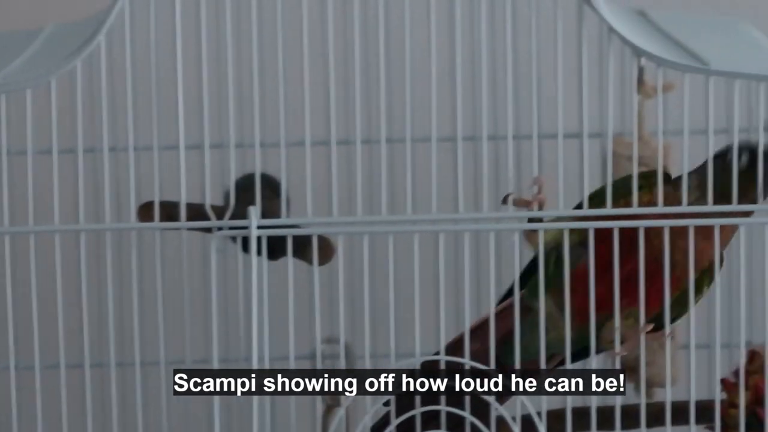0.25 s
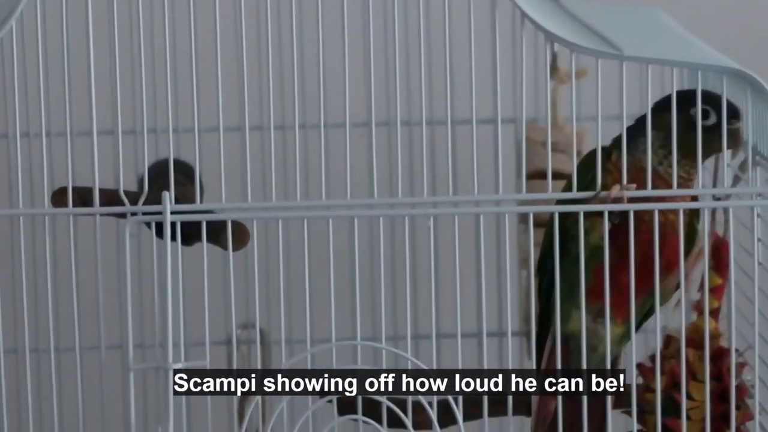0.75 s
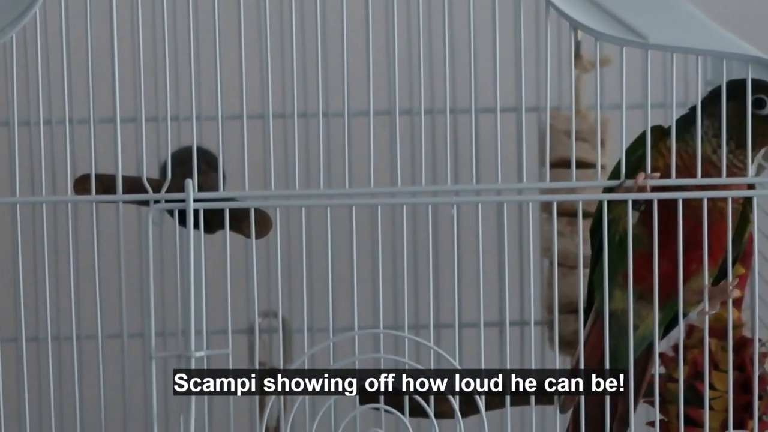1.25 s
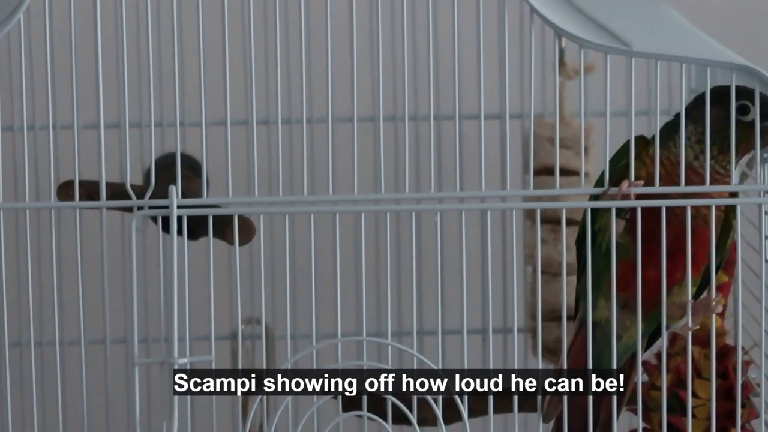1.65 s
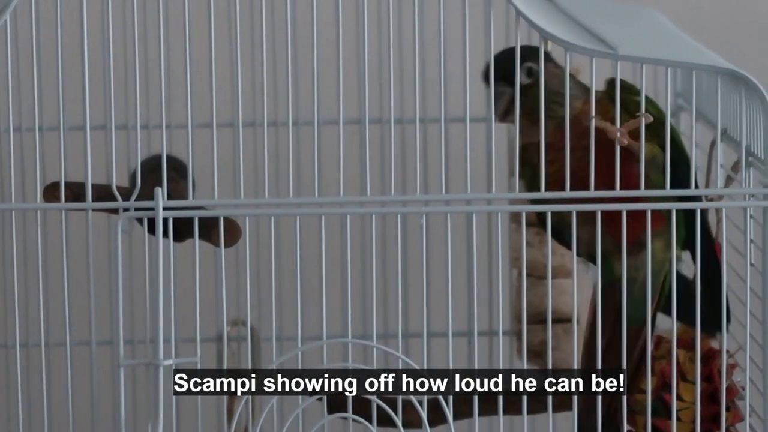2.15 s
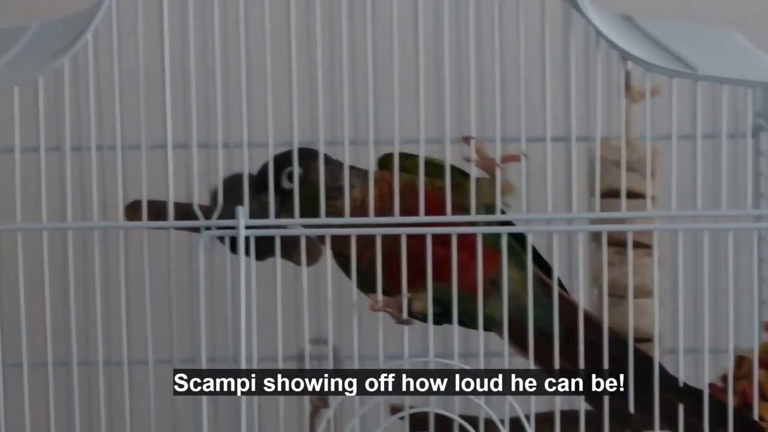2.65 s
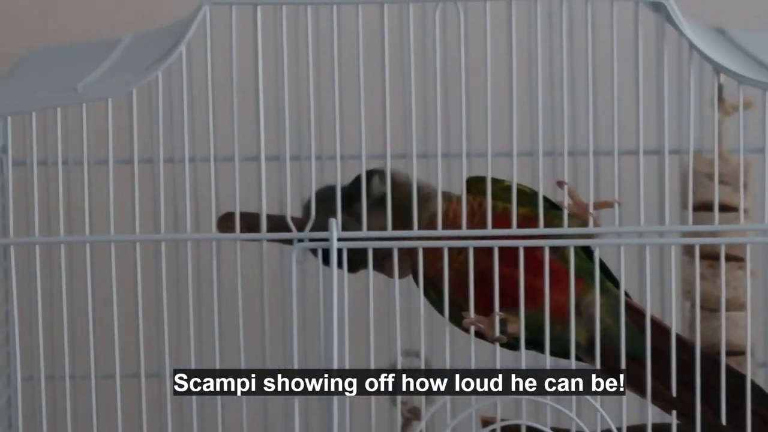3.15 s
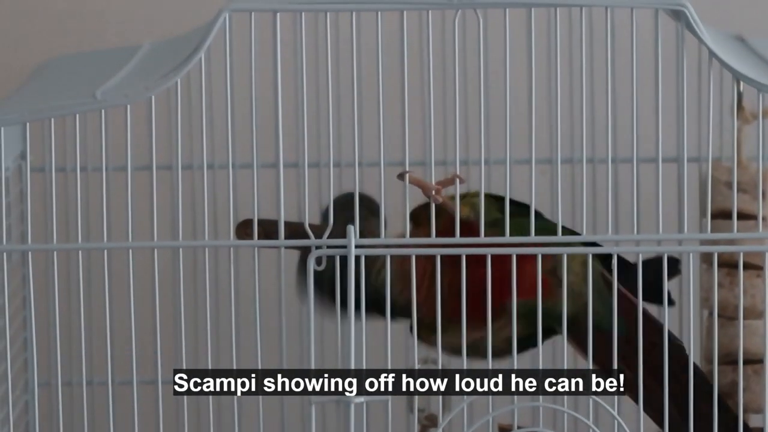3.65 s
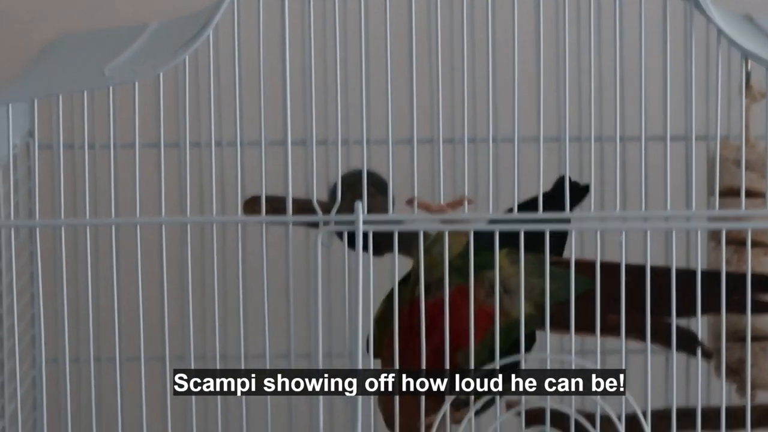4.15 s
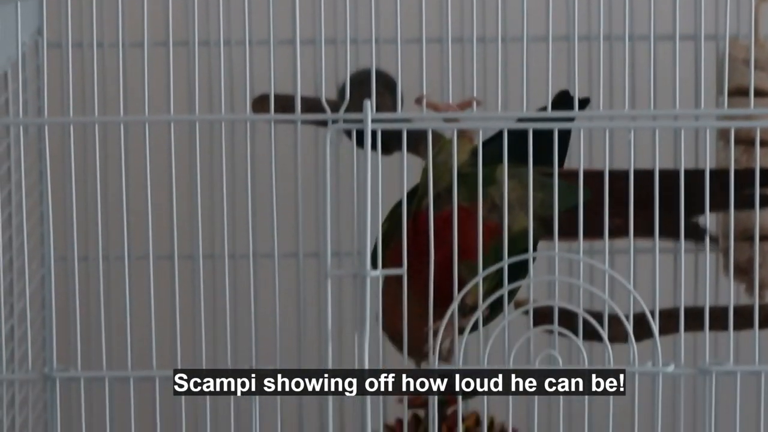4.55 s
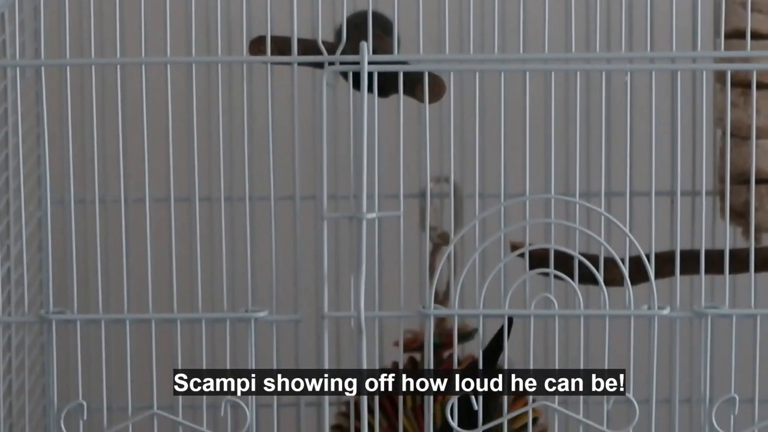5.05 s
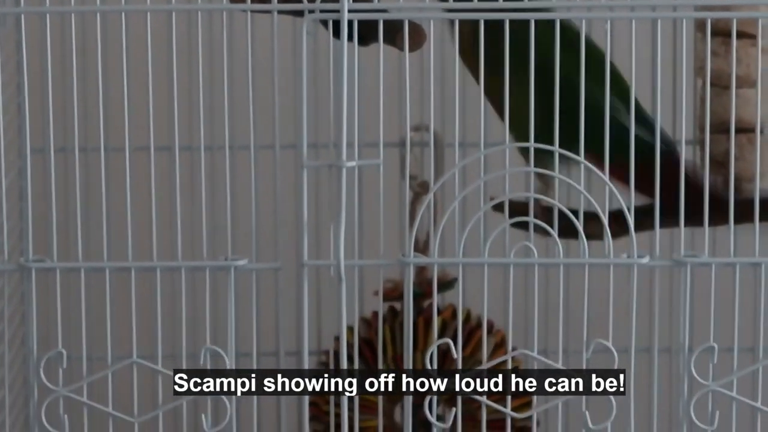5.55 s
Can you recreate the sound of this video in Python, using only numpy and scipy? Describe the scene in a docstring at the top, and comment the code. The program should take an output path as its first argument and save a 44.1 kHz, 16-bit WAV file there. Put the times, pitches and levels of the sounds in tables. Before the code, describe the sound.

A small caged parrot screeches harshly in short piercing bursts indoors, pauses with light scuffing on the bars, then growls and screeches again.

```python
"""A small parrot screeches eight times in a wire cage indoors, with one soft mutter and a growl between.
The two sides of its syrinx sound at once, a buzzy low voice and a high whistle. Each screech scoops up out of
a rasp, holds, and is cut off; now and then the whistle flares up pure and the low voice gives way to it.
Short grainy noises are the bird scuffing along the bars, and sparse decaying echoes make the room ring.
Wavering sine tones, a rumble and coloured noise make a faint appliance hum and the hiss of the room."""
import sys
import numpy as np
from scipy import signal
from scipy.fft import rfft, irfft, next_fast_len
from scipy.io import wavfile
from scipy.ndimage import uniform_filter1d

SR = 44100
rng = np.random.default_rng(int(sys.argv[2]) if len(sys.argv) > 2 else 0)


def file_out(sig):
    """Save sig as 16-bit WAV at sys.argv[1]."""
    # one column per channel
    cols = np.atleast_2d(sig).T
    # limit, then scale
    lim = np.clip(cols, -1, 1)
    pcm = np.round(lim * 32767).astype(np.int16)
    wavfile.write(sys.argv[1], SR, pcm)


N = 255780
TIME = np.arange(N) / SR

# colour of the rasp and of the growl's hiss: frequency_hz, level_db
RASP_COLOUR = [(400, -43.5), (900, -21.5), (1400, -13.5), (1850, -12), (2800, -3.5), (3600, -2),
               (4300, -0.5), (5400, -4), (7200, -8), (9200, -15.5), (11000, -9.5), (12600, -20),
               (13600, -31), (15500, -36.5)]
# how much of the overtone edge each frequency gets: frequency_hz, share (0-1)
EDGE_SHARE = [(3300, 0.13), (5200, 0.88)]
RELEASE_S, RELEASE_DB = 0.035, -39  # after the hold a call falls by this much in each such time


def amp(db):
    """Decibels to gain."""
    return 10 ** (np.asarray(db) / 20)


def unit(x):
    """Scales to rms 1."""
    return x / np.sqrt(np.mean(x ** 2) + 1e-20)


def at_hz(points, hz):
    """Reads a spectrum on a log-frequency axis."""
    f, value = np.transpose(points)
    return np.interp(np.log(hz + 1), np.log(f + 1), value)


def at_time(points, t):
    """Reads a curve of time and value at the times t."""
    s, value = np.transpose(points)
    return np.interp(t, s, value)


def shaped(x, gain):
    """Filters x by a gain given as a function of frequency."""
    size = next_fast_len(x.shape[-1])
    spectrum = rfft(x, size) * gain(np.fft.rfftfreq(size, 1 / SR))
    return irfft(spectrum, size)[..., :x.shape[-1]]


def noise(count, gain):
    """Coloured noise of rms 1."""
    return unit(shaped(rng.standard_normal(count), gain))


def wobble(count, rate_hz):
    """Random motion of rms 1, up to about rate_hz."""
    return noise(count, lambda f: 1 / (1 + (f / rate_hz) ** 4))


def add(mix, s, sound):
    """Mixes a sound in at time s."""
    part = mix[max(round(s * SR), 0):][:len(sound)]
    part += sound[:len(part)]


def air(spectrum):
    """Room noise at two ears, alike in the bass and independent in the treble."""
    # frequency_hz, left-right correlation
    ear_likeness = [(30, 1), (70, .9), (130, .5), (300, 0.66), (700, 0.6), (2000, .4), (8000, 0)]

    def side_gain(f):
        likeness = np.clip(at_hz(ear_likeness, f), -0.9, 1)
        return np.sqrt((1 - likeness) / (1 + likeness))

    mid, side = (noise(N, lambda f: amp(at_hz(spectrum, f))) for _ in range(2))
    side = shaped(side, side_gain)
    return np.array([mid + side, mid - side])


def background():
    """A wavering appliance hum with its rumble, and room hiss that turns from an early to a late colour."""
    # partials of the hum: pitch_hz, level_db
    hum_lines = [(300.2, 0), (97, -14), (645, -18), (740, -15)]
    # spectra of the rumble and of the early and late hiss: frequency_hz, level_db
    rumble_colour = [(15, -50), (25, -10.5), (91, -8.5), (231, -12.5), (265, -11.5), (295, 0.5),
                     (314, -16.5), (329, -6.5), (592, -31.5), (746, -20), (1000, -36.5), (1300, -52.5),
                     (2200, -120)]
    early_colour = [(240, -23), (400, 0.5), (576, -19.5), (756, -1.5), (1020, -5), (1120, -2.5),
                    (2790, -27), (4330, -22.5), (4960, -19), (5770, -31.5), (8060, -26.5), (12300, -31.5),
                    (15000, -59.5)]
    late_colour = [(240, -30), (400, -5), (526, -5), (756, -3.5), (1290, -9.5), (1520, -9.5), (1820, -13.5),
                   (2320, -15), (3830, -21), (12900, -35), (15000, -55.5)]
    # crossfade of the hiss: time_s, share of the late colour (0-1)
    hiss_turn = [(1.0, 0.1), (1.25, 0.84), (2.8, 0.99)]
    # relative levels through the scene: time_s, level_db
    hum_level = [(0.0, -58), (0.73, -50.5), (0.77, -46.5), (0.98, -43), (1.0, -52), (1.39, -64.5),
                 (1.78, -56), (1.84, -70), (2.24, -71.5), (2.79, -57.5), (4.2, -48), (4.47, -53),
                 (4.77, -46), (4.85, -59), (5.74, -59), (5.8, -63)]
    hiss_level = [(0.0, -56.5), (0.89, -49.5), (1.18, -57), (1.31, -62.5), (1.78, -61), (1.94, -67),
                  (3.15, -64.5), (3.51, -57), (4.77, -58), (4.9, -60.5), (5.39, -64), (5.8, -59)]

    hum_gain = amp(at_time(hum_level, TIME))
    hiss_gain = amp(at_time(hiss_level, TIME))
    hum = np.zeros(N)
    for hz, db in hum_lines:
        level = amp(db + 1.8 * wobble(N, rate_hz=9))
        pitch_hz = hz + 0.86 * wobble(N, rate_hz=3.5)
        hum += level * np.sin(2 * np.pi * np.cumsum(pitch_hz) / SR)
    late = np.clip(at_time(hiss_turn, TIME), 0, 1)
    early_hiss = amp(3.0) * np.sqrt(1 - late) * air(early_colour)
    late_hiss = amp(1.14) * np.sqrt(late) * air(late_colour)
    # the rumble follows the hum's level, but only half as far in decibels
    rumble = amp(-57.5) * unit(hum_gain ** 0.5) * air(rumble_colour)
    return amp(1.5) * hum_gain * hum + hiss_gain * (early_hiss + late_hiss) + rumble


def room_tail():
    """Strong echoes off the near walls, then sparse ones; each band dies at its own speed; total energy 1."""
    # decay of each band: frequency_hz, t60_s
    decay = [(500, 0.81), (2600, 0.36), (4200, 0.45), (8000, 0.44), (13000, 0.29)]
    taps = rng.choice([-1., 1.], SR) * (rng.random(SR) < 3000 / SR)  # about 3000 echoes a second
    taps *= np.arange(SR) > 0.004 * SR
    near_walls = (SR * rng.uniform(0.003, 0.016, size=6)).astype(int)
    taps[near_walls] = 2.8 * rng.choice([-1., 1.], size=6)
    hz, t, bands = signal.stft(taps, SR, nperseg=256)
    fade = amp(-60 * t / at_hz(decay, hz)[:, None])
    tail = signal.istft(bands * fade, SR, nperseg=256)[1]
    return tail / np.linalg.norm(tail)


def in_room(x, wet_db, side_wet_db, side_direct_db):
    """Direct sound and room at a close pair of microphones, whose phases part towards the treble."""
    # stereo width: frequency_hz, gain of the side signal_db
    width = [(1300, -12.5), (2600, -14.5), (4200, -7), (6300, -2), (8200, 3.5), (11000, 3), (15000, 9)]
    mid = x + amp(wet_db) * signal.fftconvolve(x, room_tail())[:N]
    quarter_turn = shaped(x, lambda f: 1j)  # every frequency shifted by 90 degrees
    side_room = signal.fftconvolve(x, room_tail())[:N]
    side = amp(side_direct_db) * quarter_turn + amp(side_wet_db) * side_room
    side = shaped(side, lambda f: amp(at_hz(width, f)))
    return np.array([mid + side, mid - side])


def patchy(x, depth_db):
    """Breaks a noise into brief, narrow blotches, as a chaotic membrane hops between tones."""
    bands = signal.stft(x, SR, nperseg=256, noverlap=192)[2]
    blotches = uniform_filter1d(rng.standard_normal(bands.shape), size=2, axis=0)  # across frequency
    blotches = unit(uniform_filter1d(blotches, size=9, axis=1))  # across time
    bands = bands * amp(depth_db * np.clip(blotches, -2, 2))
    return unit(signal.istft(bands, SR, nperseg=256, noverlap=192)[1][:len(x)])


def scuffs():
    """Feet, beak and feathers on the bars: short grainy rubs of noise that die away."""
    # start_s, level_db, t60_s, brightness_db_per_octave above 700 Hz
    scuff_rows = [(1.750, -40.5, 0.39, 3), (1.781, -47.5, 0.2, -5.5), (3.282, -47, 0.58, -3.5),
                  (3.334, -55, 0.71, -3), (3.6, -58.5, 0.33, 2.5), (3.648, -49.5, 0.33, -1.5),
                  (3.815, -57, 0.404, 1.5), (3.958, -46.5, 0.066, 1.5), (3.973, -49, 0.3, -9.5)]
    # frequency_hz, level_db
    scuff_colour = [(150, -2), (400, -4.5), (1200, 1), (2200, -5), (5000, -11.5), (9000, -19), (15000, -28)]
    out, t = np.zeros(N), np.arange(SR // 2) / SR
    for s, db, t60, tilt_db in scuff_rows:
        rub = noise(len(t), lambda f: amp(at_hz(scuff_colour, f) + tilt_db * np.log2(np.maximum(f, 700))))
        grain = unit(np.exp(0.43 * wobble(len(t), rate_hz=100)))
        envelope = amp(db - 60 * t / t60) * (1 - np.exp(-t / 0.0033))
        add(out, s, patchy(rub, depth_db=1) * grain * envelope)
    return out


def membrane(hz, rough, jitter, drift, flutter_hz):
    """Phase of one vibrating side of the syrinx; roughness shakes its pitch and makes it hop."""
    hops = np.tanh(3 * wobble(len(hz), rate_hz=55))
    shake = jitter * rough * wobble(len(hz), flutter_hz) + drift * (1 + 3 * rough) * hops
    return 2 * np.pi * np.cumsum(hz * (1 + shake)) / SR


def growl():
    """Both sides of the syrinx flap loosely at low pressure, with a grating hiss; gives start and sound."""
    # start_s, end_s, low_side_hz, low_side_db, high_side_hz, high_side_db
    growl_row = (4.595, 4.785, 2091, -39.5, 3985, -41)
    attack_s, swell_db = 0.025, 9.5  # fade at either end; growth from start to end
    closing_hz = 160  # each side moves this far towards the other
    start, end, low_hz, low_db, high_hz, high_db = growl_row
    t = np.arange(0, end - start, 1 / SR)
    growth = t / t[-1] - 0.5
    low_phase = membrane(low_hz + closing_hz * growth, rough=0.95, jitter=0.081, drift=0.0098, flutter_hz=356)
    high_phase = membrane(high_hz - closing_hz * growth, rough=1, jitter=0.0447, drift=0.01184, flutter_hz=348)
    voices = amp(low_db) * np.sin(low_phase) + amp(high_db) * np.sin(high_phase)
    hiss = noise(len(t), lambda f: amp(at_hz(RASP_COLOUR, f)) / (1 + (f / 5500) ** 2))
    hiss = amp(-11) * (amp(low_db) + amp(high_db)) * patchy(hiss, depth_db=7.5)
    grating = unit(np.exp(0.25 * wobble(len(t), rate_hz=150)))
    fades = np.minimum(np.minimum(t, t[-1] - t) / attack_s, 1)
    return start, (voices + hiss) * grating * amp(swell_db * growth) * fades


def flares(t):
    """Bell-shaped surges of the whistle: how far they have taken over (0-1), their gain and their pitch."""
    # middle_s, length_s, pitch_hz, level_db
    flare_rows = [ (1.019, 0.018, 4354, -14.5), (1.043, .022, 4135, -12.5), (1.072, .016, 4105, -11),
                  (1.117, 0.025, 4053, -17.5), (1.48, .012, 4330, -35), (1.555, 0.022, 4250, -36),
                  (1.595, 0.017, 4216, -43), (1.651, 0.007, 4270, -37.5), (1.817, .016, 4125, -8.5),
                  (1.864, 0.02, 4236, -12), (1.968, 0.011, 4263, -14.5), (2.131, 0.039, 4229, -15),
                  (2.207, 0.014, 4105, -16.5), (2.272, 0.042, 4064, -22.5), (2.429, .013, 4200, -7.5),
                  (2.537, 0.029, 4034, -16.5), (4.79, .012, 4050, -21), (4.807, 0.011, 4048, -8.5),
                  (4.852, .024, 4400, -17), (4.932, 0.021, 4034, -17), (4.986, 0.031, 4075, -30.5),
                  (5.123, 0.011, 3900, -19), (5.163, .012, 4130, -15), (5.195, .022, 4085, -15),
                  (5.25, 0.025, 4077, -13.5), (5.32, 0.0278, 4070, -26), (5.519, 0.0078, 4110, -9),
                  (5.592, 0.025, 4064, -15.5), (5.8, 0.027, 4177, -11), ]
    s, length, hz, db = np.transpose(flare_rows)[:, :, None]
    within_call = (s > t[0]) * (s < t[-1] - RELEASE_S)
    bells = np.exp(-(2 * (t - s) / length) ** 2) * within_call + 1e-12
    gains = bells * amp(db)
    return bells.max(0), gains.sum(0), (gains * hz).sum(0) / gains.sum(0)


def rasp(count, edge_db):
    """Chaotic, blotchy noise in quick bursts, its treble raised or lowered with the overtone edge."""
    bursts = unit(np.exp(0.12 * wobble(count, rate_hz=430)))
    chaos = patchy(noise(count, lambda f: amp(at_hz(RASP_COLOUR, f))), depth_db=6.5)
    treble = shaped(chaos, lambda f: at_hz(EDGE_SHARE, f))
    return (chaos + (amp(0.5 * edge_db - 2.5) - 1) * treble) * bursts


def two_voices(low_hz, low_db, high_hz, high_db, rough, edge_db):
    """Low voice and whistle from the two sides of the syrinx, and the tones they make together."""
    # gain of throat and beak on the low voice: frequency_hz, gain_db
    throat = [(1150, -32.5), (1310, -16), (1480, -30), (2050, -26), (2450, -4), (3250, 6), (3900, -2),
              (4750, -7), (5150, -6.5), (6500, -7), (7600, -22), (9100, -21.5), (10400, -9), (11700, -18),
              (13500, -38)]
    count = len(low_hz)
    low = membrane(low_hz, rough ** 1.7, jitter=0.062, drift=0.0095, flutter_hz=451)
    high = membrane(high_hz, rough ** 1.454, jitter=0.0412, drift=0.005, flutter_hz=395)

    def overtone(phase, hz):
        """The higher a partial, the more it comes and goes as beak and tongue move."""
        share = at_hz(EDGE_SHARE, hz)
        motion = np.clip(wobble(count, rate_hz=45), -1.6, 1.6)
        flicker = unit(amp((2 + 4 * share) * motion))
        return amp(edge_db * share) * flicker * np.sin(phase)

    buzz = sum(amp(at_hz(throat, k * low_hz)) * overtone(k * low, k * low_hz) for k in range(1, 11))
    whistle = np.sin(high)
    whistle = whistle + amp(-18.0) * overtone(2 * high, 2 * high_hz)
    whistle = whistle + amp(-30.5) * overtone(3 * high, 3 * high_hz)
    # the two sides share one airstream, which gives sum and difference tones
    mixed = amp(-19.0) * overtone(high + 2 * low, high_hz + 2 * low_hz) + amp(-26.5) * np.sin(4 * low - high)
    voiced = amp(low_db) * buzz + amp(high_db) * whistle + amp((low_db + high_db) / 2) * mixed
    return voiced * np.sqrt(2) * (1 + 0.5 * rough * wobble(count, rate_hz=220))


def screech(row, pitch):
    """One breath drives both sides of the syrinx and a rasp through lead-in, hold and fall."""
    attack_s, settle_s = 0.0062, 0.016  # the voice catches at once; the roughness settles more slowly
    lead_db, lead_growth_db = -10, 3.5  # the lead-in is softer than the hold, and grows by this much
    scoop, lead_edge_db = 0.24, -13  # it starts this share flat, and dull
    give_way_db, clearing = -8.5, 0.6  # in a flare the low voice drops, and both sides lose this share of roughness
    rebound_s, rebound_db = 0.022, 3.5  # just after a flare the low voice comes back stronger
    sway_db, sway_hz = 1.5, 30  # the breath sways between the two sides
    start, hold, lead, low_db, change_db, high_db, high_hz, glide_hz, start_rough, rough, edge_db = row
    t = np.arange(start - lead, start + hold + 3 * RELEASE_S, 1 / SR)
    count, age = len(t), t - start
    progress = np.clip(age / hold, 0, 1)
    leading = np.clip(-age / lead, 0, 1)  # 1 at the first sample, 0 from the hold on

    breath_db = lead_db * np.clip(-age / attack_s, 0, 1) - lead_growth_db * leading
    breath_db += RELEASE_DB * np.maximum(age - hold, 0) / RELEASE_S
    edge_db = edge_db + lead_edge_db * leading
    flare, flare_gain, flare_hz = flares(t)
    rebound = flares(t - rebound_s)[0]
    sway = sway_db * wobble(count, rate_hz=sway_hz)

    low_db = low_db + breath_db + change_db * progress + sway
    low_db = low_db + give_way_db * flare + rebound_db * rebound
    low_hz = at_time(pitch, t) * (1 - scoop * leading)
    steady_gain = amp(high_db + breath_db - sway)
    steady_hz = high_hz + glide_hz * (progress - 0.5)
    whistle_gain = steady_gain + flare_gain
    high_db = 20 * np.log10(whistle_gain)
    high_hz = (steady_gain * steady_hz + flare_gain * flare_hz) / whistle_gain
    settling = np.exp(-np.maximum(age, 0) / settle_s)
    rough = (rough + (start_rough - rough) * settling) * (1 - clearing * flare)
    rough = np.clip(rough, 0, 1)

    voiced = two_voices(low_hz, low_db, high_hz, high_db, rough, edge_db)
    effort = np.hypot(amp(low_db), 0.76 * amp(high_db))
    call = voiced + amp(1.5) * rough ** 1.38 * effort * rasp(count, edge_db)
    call = call * signal.windows.tukey(count, 0.04)
    # the call keeps nothing below about 1.1 kHz
    return t[0], shaped(call, lambda f: 1 - 1 / (1 + (f / 1100) ** 10))


def scene():
    """The bird in its room, over the background."""
    # one row a call, the second a soft mutter; levels are relative: start_s, hold_s, lead_in_s, low_voice_db,
    # low_voice_change_db over the hold, whistle_db, whistle_hz, whistle_glide_hz over the hold,
    # start_roughness and hold_roughness (limited to 0-1), overtone_edge_db
    calls = [ (0.988, 0.12, .005, -18, -7, -24, 4260, -400, .75, .58, -2),
             (1.44, .21, .04, -56.5, -6, -54, 4303, -80.5, 1.04, .65, -0.5),
             (1.811, 0.14, .024, -21.5, -1, -27.5, 4345, 259, 0.87, .3, -0.5),
             (2.076, 0.15, .026, -28, 0, -27, 4110, -71.5, 0.94, 0.39, -2.5),
             (2.387, .145, 0.031, -23.5, -2, -25, 4157, -67, .75, .5, -5),
             (4.806, .133, 0.028, -16, -9, -25.5, 4164, -100, 0.48, 0.24, -1),
             (5.119, .145, .016, -18, -6, -22, 4040, 340, 0.55, .32, 0),
             (5.453, .14, .011, -24, 3, -25.5, 3962, 249, 0.38, 0.32, 0.5),
             (5.727, 0.11, .028, -20, -6.5, -22, 4100, 302, 0.57, 0.27, 3), ]
    # pitch of the low voice, one curve a call: time_s, pitch_hz
    low_pitches = [
        [(.987, 1171), (1.008, 1372), (1.04, 1547), (1.12, 1522)],
        [(1.43, 1508), (1.5, 1580), (1.65, 1567)],
        [(1.812, 1522), (1.836, 1597), (1.9, 1581), (1.94, 1634)],
        [(2.075, 1571), (2.12, 1640), (2.165, 1469), (2.22, 1550)],
        [(2.39, 1385), (2.425, 1530), (2.53, 1467)],
        [(4.81, 1447), (4.87, 1399), (4.905, 1265), (4.935, 1326)],
        [(5.118, 1301), (5.14, 1231), (5.165, 1318), (5.205, 1313), (5.245, 1450)],
        [(5.453, 1281), (5.525, 1295), (5.55, 1214), (5.578, 1395)],
        [(5.726, 1463), (5.745, 1309), (5.78, 1344)],
    ]
    bird = scuffs()
    add(bird, *growl())
    for row, pitch in zip(calls, low_pitches):
        s, call = screech(row, pitch)
        add(bird, s, amp(-3.0) * call)
    return in_room(bird, wet_db=-3.5, side_wet_db=-0.5, side_direct_db=-4.0) + background()


def record(dry):
    """The loudest peaks are rounded off; then the recorder's band limit."""
    ceiling, cut_hz = 0.85, 15700  # full scale is 1
    limited = dry / (1 + (dry / ceiling) ** 6) ** (1 / 6)
    lowpass = signal.firwin(511, cut_hz, window=("kaiser", 9), fs=SR)
    return signal.oaconvolve(limited, lowpass[None], "same")


dry = scene()
out = record(dry)
file_out(out)
```